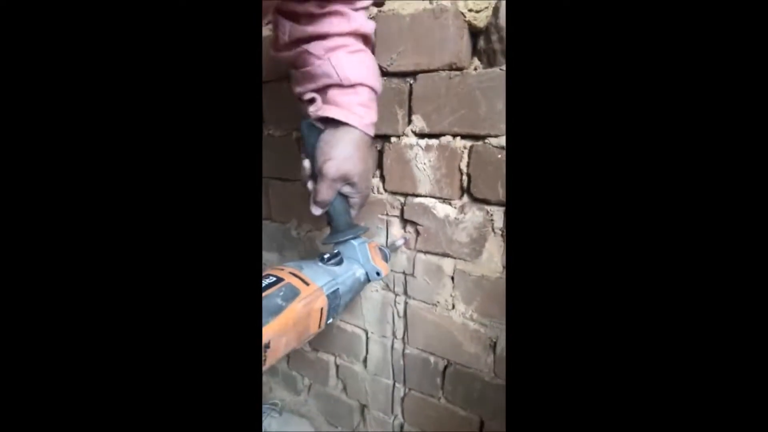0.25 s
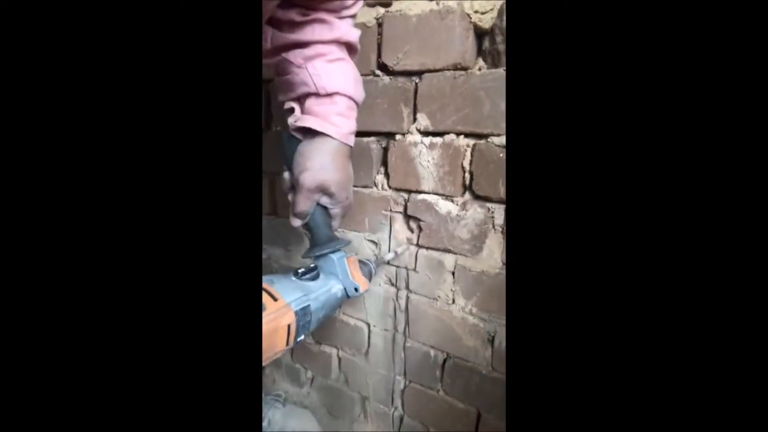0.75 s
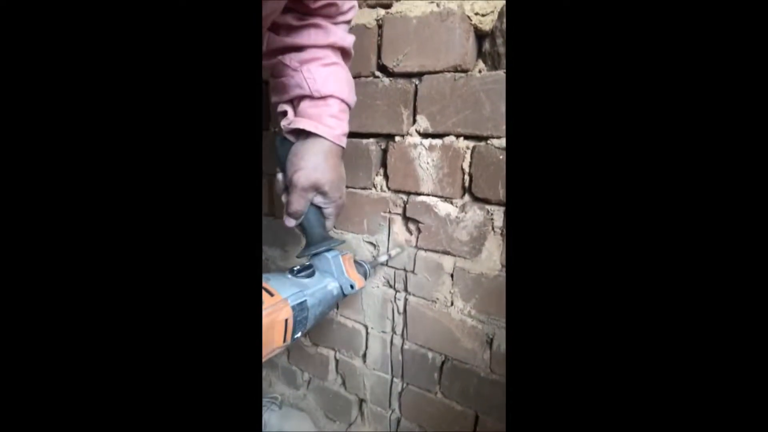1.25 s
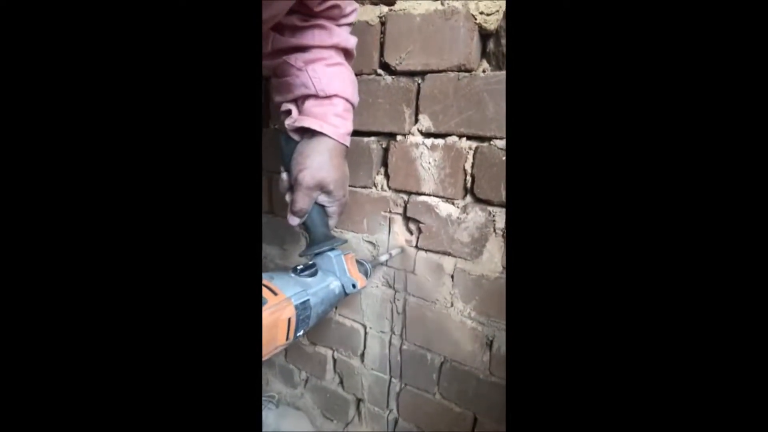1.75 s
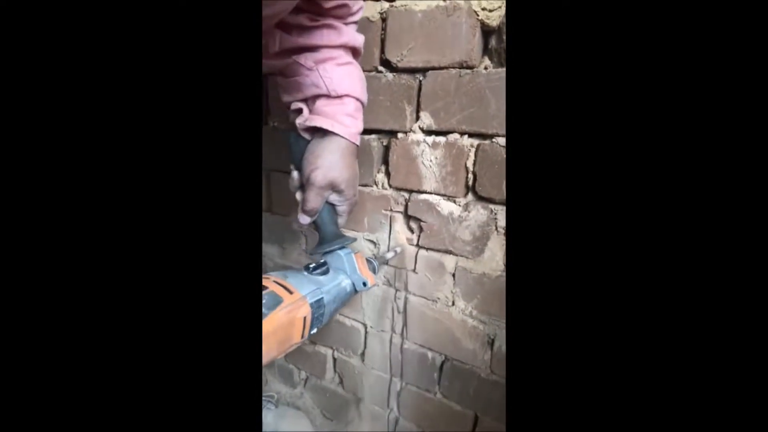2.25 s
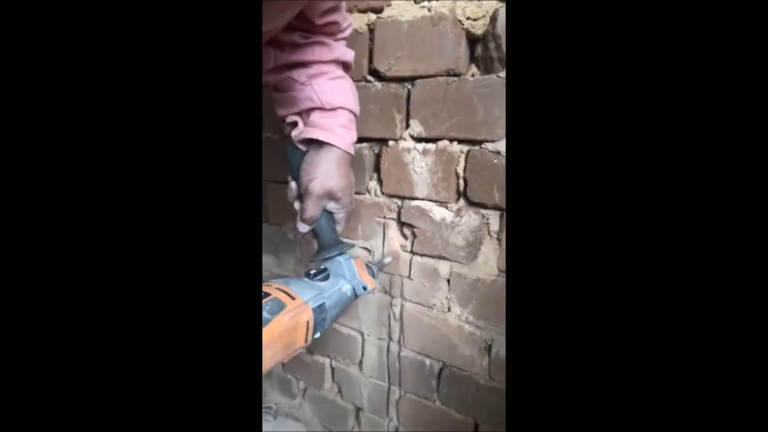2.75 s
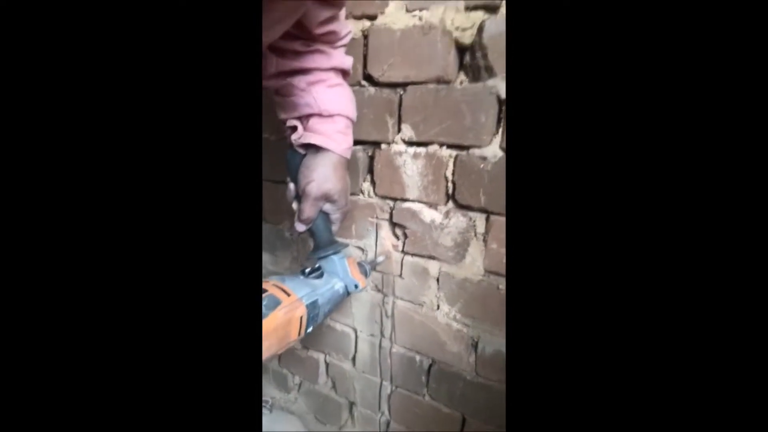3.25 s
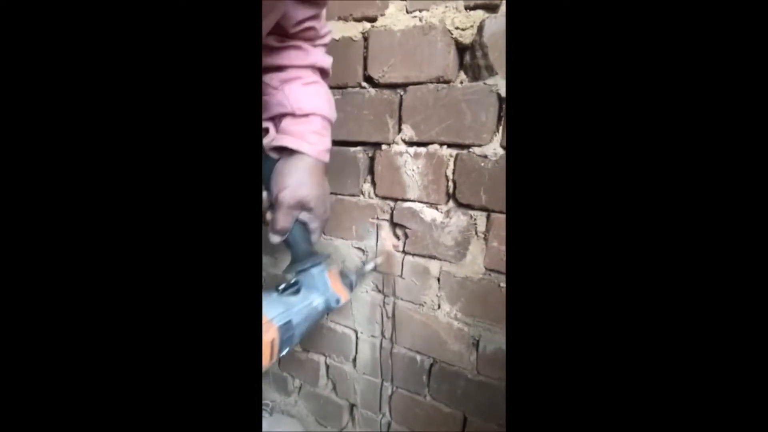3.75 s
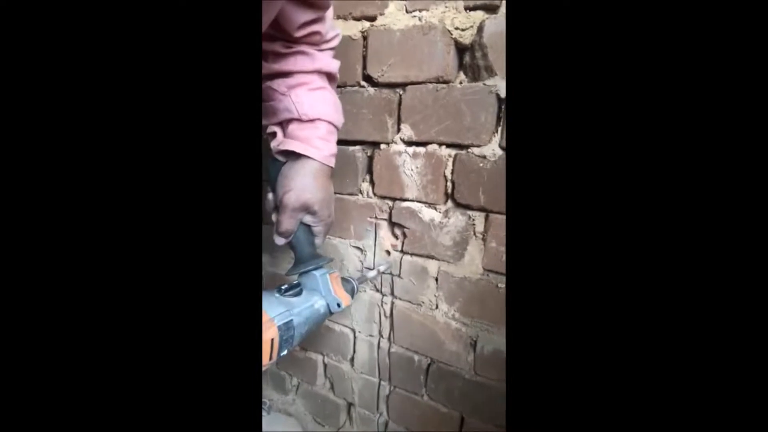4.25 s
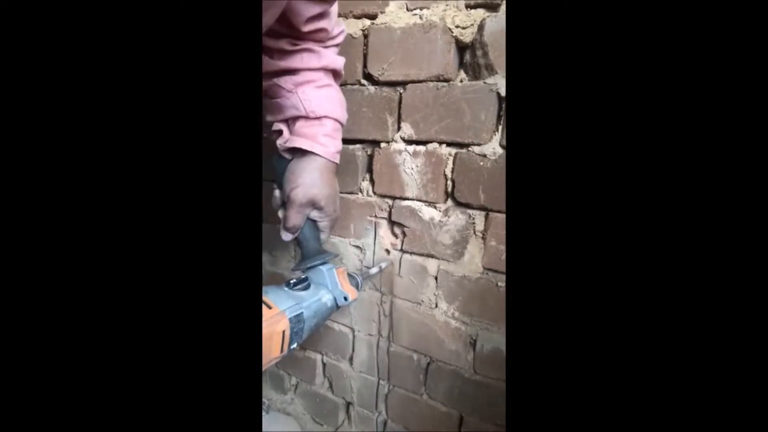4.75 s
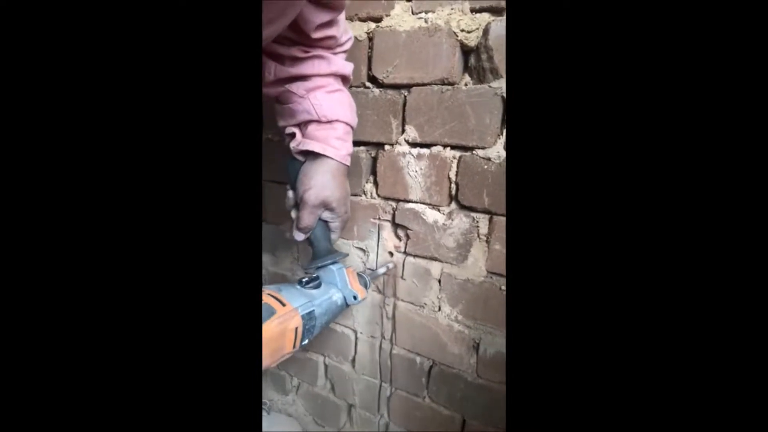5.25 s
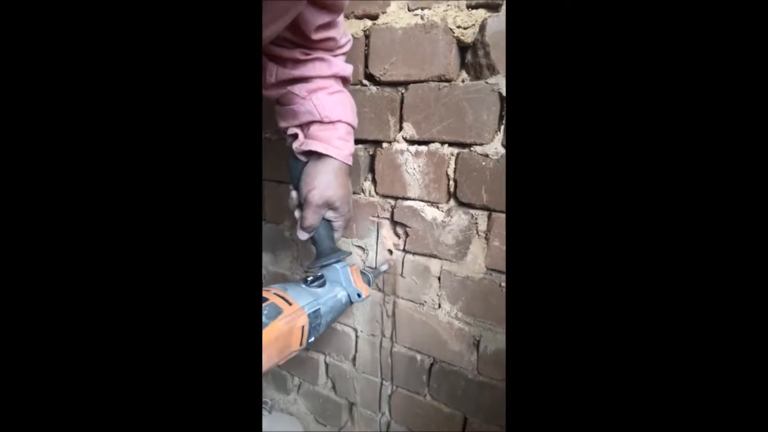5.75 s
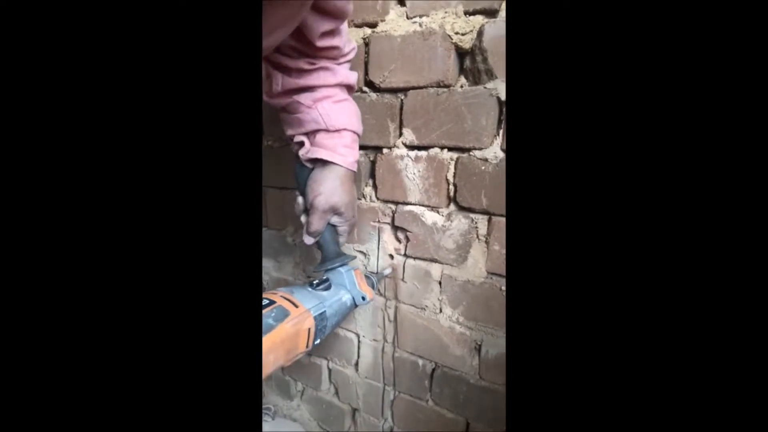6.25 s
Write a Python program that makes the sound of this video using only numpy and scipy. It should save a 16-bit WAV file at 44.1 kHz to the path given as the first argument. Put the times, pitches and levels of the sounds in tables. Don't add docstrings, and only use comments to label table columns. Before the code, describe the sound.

Close, mono phone pickup of a hand drill on a brick wall outdoors. It starts already biting, a brief hard rattle, then the motor runs free with a whine and fan rush. A second dense burst of ringing knocks and grit follows, fades into light ticks and airy whirring, then a third, longer burst grinds on and loosens into weaker taps at the end.

```python
import sys
import numpy as np
from scipy import signal
from scipy.io import wavfile
from scipy.ndimage import uniform_filter1d

SR = 44100
rng = np.random.default_rng(int(sys.argv[2]) if len(sys.argv) > 2 else 0)


def transcribe(signal):
    frames = np.atleast_2d(signal).T
    limited = np.clip(frames, -1, 1)
    pcm = np.round(limited * 32767).astype(np.int16)
    wavfile.write(sys.argv[1], SR, pcm)


def decibels_to_gain(level_db):
    exponent = np.asarray(level_db, float) / 20
    return 10 ** exponent


N = 287091

# (start [s], end [s])
PUSHES = [
    (-.01, .34),
    (1.51, 2.9),
    (4.51, 6.29),
]
# (time [s], peak level [dB])
FIRST_PUSH = [(0.0046, -11), (0.029, -10), (0.0504, -10), (0.0608, -13), (0.0643, -13), (0.0792, -13),
              (0.0892, -13), (0.0926, -17), (0.1029, -9.5), (0.1244, -9), (0.149, -7), (0.153, -13),
              (0.172, -8.5), (0.203, -9), (0.2077, -12), (0.2203, -10), (0.2388, -7.5), (0.2495, -10),
              (0.2733, -11), (0.2775, -11), (0.29, -6.5), (0.3013, -12)]
# (time [s], peak level [dB])
SECOND_PUSH = [(1.5129, -9), (1.5338, -12.5), (1.541, -10), (1.5835, -17), (1.606, -12), (1.61, -12),
               (1.6245, -20), (1.628, -4.5), (1.639, -12), (1.654, -9), (1.6582, -5.5), (1.6613, -5),
               (1.6727, -8), (1.679, -7), (1.6826, -6), (1.695, -9), (1.7093, -6.5), (1.715, -11),
               (1.7283, -14), (1.748, -9), (1.752, -8), (1.7825, -4), (1.787, -9), (1.822, -11.5),
               (1.8263, -5), (1.83, -6), (1.8347, -9), (1.849, -13), (1.8636, -8), (1.879, -12),
               (1.8867, -7), (1.897, -15), (1.918, -6), (1.9386, -6), (1.9492, -9), (1.9534, -13),
               (1.9588, -4), (2.0078, -8.5), (2.0141, -8), (2.0382, -7), (2.048, -5.5), (2.058, -7),
               (2.07, -9), (2.0818, -3.5), (2.0863, -8), (2.0923, -10), (2.106, -5), (2.1127, -6),
               (2.1166, -14), (2.1286, -8), (2.1402, -11), (2.1522, -4), (2.1651, -7), (2.18, -10),
               (2.1838, -10),
               (2.193, -11), (2.209, -6), (2.215, -3), (2.2256, -8), (2.234, -11), (2.2428, -7),
               (2.2557, -6), (2.2632, -8), (2.269, -9), (2.281, -9), (2.2954, -9), (2.305, -11), (2.31, -8),
               (2.3235, -12), (2.3273, -13), (2.3376, -7), (2.3626, -13), (2.366, -13), (2.3755, -7),
               (2.383, -8), (2.3948, -10.5), (2.404, -14), (2.4183, -15), (2.4213, -7), (2.429, -8),
               (2.4433, -13), (2.475, -5), (2.4875, -8.5), (2.4981, -8.5), (2.514, -9.5), (2.522, -12.5),
               (2.5275, -12.5), (2.5428, -10), (2.5468, -7.5), (2.561, -11), (2.588, -10.0), (2.6, -12),
               (2.6064, -15), (2.617, -9), (2.6296, -11), (2.6347, -11), (2.6486, -13), (2.6633, -11.0),
               (2.6832, -9), (2.6978, -11), (2.714, -10), (2.7302, -10.5), (2.736, -12), (2.7675, -9.5),
               (2.7728, -9.5), (2.7995, -16), (2.8206, -6.5), (2.8276, -9), (2.862, -13), (2.887, -12)]
# (time [s], peak level [dB])
THIRD_PUSH = [(4.5182, -9.5), (4.5577, -9.5), (4.57, -15), (4.5772, -7), (4.5827, -4.5), (4.594, -11),
              (4.6138, -6), (4.6294, -9), (4.6546, -14), (4.6662, -13), (4.6756, -8), (4.6869, -9),
              (4.698, -8), (4.7089, -7), (4.7222, -10), (4.7331, -11), (4.743, -14), (4.7473, -8),
              (4.7643, -9.5), (4.769, -8.5), (4.791, -12.5), (4.796, -7), (4.807, -11), (4.8218, -12),
              (4.8317, -12), (4.844, -5), (4.8543, -7), (4.8702, -12), (4.8812, -10.5), (4.8921, -10),
              (4.8973, -12), (4.9083, -8), (4.918, -9.5), (4.9283, -13), (4.943, -9), (4.9522, -10),
              (4.9574, -9), (4.97, -12), (4.9797, -10), (4.988, -9), (4.9963, -10), (5.006, -11.0),
              (5.016, -10), (5.0272, -11.0), (5.043, -8), (5.055, -8.5), (5.077, -12), (5.092, -7),
              (5.117, -11), (5.14, -12), (5.1458, -13), (5.171, -9), (5.182, -9), (5.1873, -9),
                (5.1923, -7), (5.2011, -10.5), (5.213, -9), (5.231, -13), (5.2475, -11), (5.2557, -10.5),
                (5.2683, -8), (5.2745, -9), (5.2923, -12), (5.302, -13), (5.3317, -7), (5.338, -8),
                (5.3429, -11), (5.3585, -8), (5.3621, -8.5), (5.367, -12), (5.385, -9), (5.3897, -8),
                (5.4016, -9.5), (5.4054, -11.5), (5.409, -9), (5.427, -13), (5.4312, -8.5), (5.4574, -7),
                (5.4705, -10.5), (5.4842, -12), (5.4895, -6.5), (5.5076, -8), (5.5207, -11.5), (5.533, -15),
                (5.5394, -10), (5.552, -7), (5.56, -8.5), (5.5877, -9.5), (5.6, -8), (5.6041, -8),
                (5.6193, -6.5), (5.63, -11), (5.6361, -9), (5.6648, -9.5), (5.6682, -13), (5.6794, -9),
              (5.6904, -8), (5.7095, -10), (5.7186, -11), (5.7521, -9), (5.757, -9), (5.7734, -8),
              (5.7776, -10), (5.7824, -10), (5.7964, -6), (5.8001, -7), (5.805, -9), (5.8125, -11),
              (5.8285, -11), (5.8436, -6), (5.848, -8), (5.8645, -8.5), (5.8739, -13), (5.891, -15),
              (5.8949, -10), (5.9025, -7), (5.9192, -11.5), (5.9401, -8), (5.946, -8), (5.9582, -9.5),
              (5.9698, -11), (5.9841, -9), (5.989, -10), (6.013, -7), (6.0192, -8), (6.0475, -6),
              (6.0825, -8), (6.0859, -11.0), (6.0932, -10), (6.1116, -9), (6.1325, -10), (6.1361, -11),
              (6.1414, -12), (6.1608, -12), (6.182, -7), (6.1875, -9.5), (6.205, -14), (6.2098, -8),
              (6.217, -10), (6.228, -8), (6.233, -4.5), (6.2785, -6), (6.2819, -7)]
SOFT_EARLY = [0.013, 0.0443, 0.0538, 0.0707, 0.1136, 0.136, 0.185, 0.2296, 0.2592, 0.325, 1.5365, 1.5604,
              1.589, 1.7356, 1.7698, 1.793, 1.8, 1.8039, 1.817, 1.8516, 1.868, 1.9287, 1.972, 1.9752,
              1.9797, 1.986, 1.9916, 2.0013, 2.0213, 2.0326, 2.045, 2.0638, 2.148, 2.1597, 2.176, 2.2016,
              2.2205, 2.274, 2.289, 2.348, 2.357, 2.3984, 2.4483, 2.4527, 2.4713, 2.4935, 2.551, 2.572,
              2.5764, 2.5949, 2.622, 2.6722, 2.6903, 2.694, 2.7191, 2.7433, 2.75, 2.7634, 2.784, 2.7934]
SOFT_LATE = [2.815, 2.8407, 2.8457, 4.5117, 4.6422, 4.6483, 4.753, 4.7762, 4.78, 4.8861, 4.9243, 4.9332,
             4.976, 5.033, 5.0502, 5.0723, 5.099, 5.102, 5.114, 5.152, 5.165, 5.221, 5.2377, 5.242, 5.286,
             5.3128, 5.3183, 5.328, 5.3762, 5.3797, 5.414, 5.447, 5.4532, 5.479, 5.496, 5.5694, 5.6096,
             5.6453, 5.654, 5.659, 5.673, 5.7, 5.7033, 5.726, 5.7298, 5.7414, 5.7675, 5.8535, 5.8802, 5.915,
             5.923, 5.9496, 5.9954, 6.0378, 6.059, 6.0704, 6.1167, 6.1696, 6.2402, 6.252]
FAINT_EARLY = [0.0008, 0.007, 0.0164, 0.0335, 0.108, 0.1314, 0.155, 0.1606, 0.178, 0.309, 0.337, 1.553,
               1.6214, 1.6923, 1.7576, 1.7645, 1.8106, 1.844, 1.8562, 1.8937, 1.9024, 1.908, 1.91, 1.924,
               1.935, 1.9444, 1.9664, 2.0253, 2.042, 2.0542, 2.0775, 2.097, 2.1007, 2.1207, 2.1246, 2.1355,
               2.1443, 2.1724, 2.1871, 2.1985, 2.247, 2.2515, 2.2595, 2.2843, 2.3, 2.316, 2.354, 2.424,
               2.4346, 2.467, 2.481, 2.5045, 2.5097, 2.518, 2.582, 2.6259, 2.642, 2.6679, 2.7041, 2.7235]
FAINT_LATE = [2.7783, 2.8517, 2.87, 2.8803, 2.8928, 4.6057, 4.787, 4.813, 4.825, 4.8336, 4.838, 4.8496,
              4.861, 4.8643, 4.9037, 4.9127, 4.921, 4.962, 5.0013, 5.0114, 5.0225, 5.061, 5.066, 5.108,
              5.125, 5.1318, 5.16, 5.2043, 5.262, 5.2812, 5.297, 5.3074, 5.3212, 5.3533, 5.4232, 5.4383,
              5.4652, 5.476, 5.5025, 5.516, 5.55, 5.5759, 5.5806, 5.583, 5.593, 5.5967, 5.6232, 5.6271,
              5.7464, 5.8167, 5.822, 5.8699, 5.9281, 5.9658, 6.041, 6.0641, 6.1529, 6.1787, 6.2608, 6.273]
# (time [s],
# level [dB], rebound delay [ms], rebound level [dB])
TOUCHES = [(.547, -23.5, 9.5, -30), (2.914, -20, 11, -15), (2.943, -19, 6.5, -22), (2.969, -19, 1, -26),
           (2.992, -19, 1.5, -18), (3.015, -16, 7, -22), (3.041, -20, 3.5, -21), (3.0647, -14, 3, -21),
           (3.134, -19, 8, -31), (3.1622, -26, 8.5, -23), (3.2195, -20, -0.5, -33), (3.325, -18, 7, -17),
           (3.364, -21, 13.5, -17.5), (3.422, -20, -14, -25), (3.4535, -22, 11, -23),
           (3.478, -21, 7.5, -24), (3.502, -22, 12.5, -20), (3.524, -18, 3.5, -22), (3.5462, -23, 1, -21),
           (3.5656, -19, 3.5, -20), (3.587, -25, 1, -16), (6.3026, -11, 5.5, -5), (6.3118, -16, -11, -20),
           (6.3284, -15, 6, -17), (6.3457, -20, 5.5, -11), (6.3755, -16, 5, -9), (6.397, -13, 5, -15),
           (6.4216, -14, 1.5, -22), (6.443, -13, 1, -15), (6.47, -16, 6, -11), (6.5, -17, -1, -34)]
BLOW_DB, CEILING_DB = -15, -12
SQUEEZE = 1.19
SOFT_DB, FAINT_DB = -17, -19

# (frequency [Hz], level [dB])
BIT = [
    (650, -14),
    (1300, -11),
    (1890, -4),
    (2290, 2),
    (3170, -3.5),
    (4150, 2.5),
    (4620, -3.5),
    (6100, 2),
    (9180, -8.5),
]
BIT_WIDTH_HZ = [750, 600, 480, 360, 200, 520, 350, 800, 500]
# (time [s], shank ring [dB], tip ring [dB], loose grit [dB])
SEAT = [(0, 4.5, -0.5, -18), (.35, 7, 2.5, -11.5), (1.5, -12, 2, -7), (1.75, -5, 2.5, -12),
        (2.2, -1.5, 3, -23), (2.8, 5.5, 3.5, -9.5), (3.1, 3, 6.5, -11), (3.6, 7, 8, -11), (4.5, -6, 7, -16),
        (4.9, -4.5, 3.5, -14), (5.3, 3, 2.5, -11.5), (5.8, 4.5, 4.5, -10.5), (6.2, 3.5, 4.5, -12),
        (6.51, 3.5, 9.5, -23)]

# (time [s], turns [Hz], first order [dB], fourth order [dB], second and third orders [dB])
ARMATURE = [(0, 430, -45, -59, -70), (.3, 424.6, -43, -39, -69), (.5, 454, -39, -37, -55),
            (.8, 405, -43.5, -65, -64), (.95, 406, -43.5, -52, -64), (1.05, 438, -42.5, -51, -48.5),
            (1.5, 436.8, -39, -31, -44), (1.75, 438, -41.5, -36, -52), (2.2, 427.4, -47, -34, -80),
            (2.9, 430.6, -43.5, -33.5, -48), (3.2, 443.3, -41.5, -36, -46.5),
            (3.6, 447.3, -41, -35.5, -45.5), (4.4, 446.7, -38, -38, -45), (4.7, 444.3, -38.5, -30, -60),
            (5.1, 443.7, -39, -47, -71), (5.5, 428.2, -43, -35, -64), (6, 441, -40, -32.5, -48),
            (6.51, 444, -36, -32, -41)]
# (time [s], pitch [Hz], level [dB], octave level [dB])
GEAR = [(0, 780, -46, -36), (.3, 758, -41, -37), (.4, 736, -74, -65), (1.7, 761, -85, -65),
        (1.8, 765, -38, -58), (2.85, 768, -38, -58), (2.95, 807, -60, -65), (4.5, 818, -53, -65),
        (4.8, 815, -41, -62), (5.2, 794.6, -36, -60), (5.6, 785, -36, -60), (6.1, 792, -37.5, -60),
        (6.51, 816, -41, -60)]

# (frequency [Hz], density [dB per Hz])
AIR = [(20, -45), (45, -25), (65, -19), (120, -24), (200, -17.5), (350, -1), (700, 8), (950, -3.5),
       (1300, 1), (2300, -4.5), (5000, -3.5), (8000, -7.5), (12000, -13.5), (16000, -18)]
# (frequency [Hz], width [Hz], level [dB])
HOUSING = [
    (1350, 300, 3),
    (1780, 200, 4),
    (4750, 400, 2),
    (5550, 600, -5),
    (11100, 1300, 7.5),
]
# (time [s], share [0-1])
FREE = [(0, 0), (.35, 0.7), (.95, 1), (1.2, 0.87), (1.5, 1), (1.6, 0.05), (3, 0.45), (3.7, 0.7), (4, 1.01),
        (4.5, 0.98), (4.75, 0.33)]
# (time [s], level [dB])
NOISE_SWELL = [(0, -0.5), (.4, 0.5), (.65, -1), (.92, -1), (1.15, 3), (1.49, 5), (1.7, 3), (2.7, 1.5),
               (3.3, 1.5), (3.7, 2), (4.1, 3.5), (4.5, 4.5), (4.8, 2), (5.5, 2), (6.51, 5)]
# (level at rest [dB], share of the slow swell [ratio], added by a push [dB])
NOISES = [
    (-44, 0.94, 1.5),
    (-30.5, 1.09, -1.5),
    (-32.5, 1.09, 1),
    (-51.5, 0.37, 0),
]
GRIND_DB, HUSH_DB = 2.5, -3.2
GRIND_S = .006

# (frequency [Hz], level [dB])
HUM = [
    (60, -64),
    (90, -65.5),
    (240, -55),
]
# (start [s], end [s], from [Hz], to [Hz], level [dB])
PASSING = [
    (3.48, 3.72, 298, 275, -46.5),
    (3.53, 3.743, 230, 180, -52.5),
    (3.74, 4.153, 85, 53, -54),
    (4.2, 4.46, 70, 57, -57),
    (0.38, 0.72, 80, 77, -62),
    (0.79, .95, 15750, 15480, -44),
]

# (time [s], share of weak bins lost [0-1])
THINNED = [(1.041, 0.25), (1.554, 0.45), (1.752, 0.33), (1.766, 0.22), (2.043, 0.44), (2.195, 0.6),
           (2.28, 0.33), (2.382, 0.44), (2.77, 0.32), (2.875, 0.5), (2.94, 0.29), (3.025, 0.25),
           (3.475, 0.45), (3.71, 0.38), (4.67, 0.34), (4.84, 0.62), (5.01, 0.29), (5.05, 0.44),
           (5.159, 0.44), (5.245, 0.56), (5.31, 0.46), (5.587, 0.48), (5.735, 0.71), (6.16, 0.58),
           (6.267, 0.37)]
TREBLE_CUT_DB = [1, -7, -27, -22, -9, -9, -6, -10, -12, -5, -4, -2, -6, -3, -5, -8, -10, -4, -3, -5, -9, -6,
                 -9, -11, -9]
EDGE_HZ, TREBLE_HZ = 15830, 9500


def evened(x):
    return x / np.sqrt(np.mean(x ** 2) + 1e-20)


def curves(rows, t):
    s, *columns = np.transpose(rows)
    return [np.interp(t, s, c) for c in columns]


def drift(rate_hz):
    return evened(signal.lfilter(*signal.butter(2, rate_hz, fs=SR), rng.standard_normal(N)))


def pushing(t):
    return sum((t > start) * (t < end) * 1. for start, end in PUSHES)


def blows():
    struck = FIRST_PUSH + SECOND_PUSH + THIRD_PUSH
    at, peak_db = np.transpose(struck)
    soft = np.ravel(SOFT_EARLY + SOFT_LATE)
    faint = np.ravel(FAINT_EARLY + FAINT_LATE)
    touch, touch_db, rebound_ms, rebound_db = np.transpose(TOUCHES)
    blow_db = BLOW_DB + SQUEEZE * (peak_db - CEILING_DB)
    times = np.r_[np.r_[at, soft, faint] - .0002, touch, touch + rebound_ms / 1000]
    return times, np.r_[blow_db, SOFT_DB + 0 * soft, FAINT_DB + 0 * faint, touch_db, rebound_db]


def ring(hz, width, rise=0.00018):
    u = np.arange(-60, 900) / SR
    swell_and_decay = np.where(u < 0, np.exp(-(u / rise) ** 2 / 2), np.exp(-np.pi * width * u))
    return np.cos(2 * np.pi * hz * u) * swell_and_decay


def bit(hits, blows_db):
    count = len(hits)
    delay = rng.uniform([-.0005, .0008, .0015], [-.0001, .002, .004], (count, 3))
    grit = (hits[:, None] + delay).ravel()
    shank_db, tip_db, grit_db = curves(SEAT, np.append(hits, grit))
    at = np.round(np.append(hits + .0003, grit) * SR).astype(int)
    rattle_db = grit_db[count:] + blows_db.repeat(3) + 4 + 3.5 * rng.standard_normal(len(grit))
    size_db = np.append(blows_db, rattle_db)
    size_db[count::3] = blows_db - 5

    hz, db = np.transpose(BIT)
    seat_db = np.outer(shank_db, abs(hz - 3200) < 400) + np.outer(tip_db, abs(hz - 6250) < 400)
    mix = decibels_to_gain(1.2 * rng.standard_normal((len(at), len(BIT))))
    evenness = np.sqrt((mix ** 2).mean(1, keepdims=True))
    mix *= decibels_to_gain(db + seat_db + size_db[:, None]) / evenness
    lag = rng.integers(-1, 4, mix.shape)
    lag[count:] *= 3
    trains = [np.bincount(np.clip(at + lag[:, k], 0, N - 1), mix[:, k], N) for k in range(len(BIT))]
    rings = sum(signal.oaconvolve(x, ring(f, width))[60:N + 60]
                for x, f, width in zip(trains, hz, BIT_WIDTH_HZ))

    dust_decay = np.exp(-1 / (.0012 * SR))
    dust = signal.lfilter([1], [1, -dust_decay], np.roll(trains[-1], -10)) * rng.standard_normal(N)
    crack = signal.sosfilt(signal.butter(4, 7500, "high", fs=SR, output="sos"), dust)
    rings = signal.sosfilt(signal.butter(3, 450, "high", fs=SR, output="sos"), rings)
    return rings + decibels_to_gain(-12.5) * crack


def tone(hz, db, waver_db, wander=0.00407):
    turns = np.cumsum(hz * (1 + wander * drift(10.84))) / SR
    return np.sqrt(2) * decibels_to_gain(db + waver_db * drift(20.0)) * np.sin(2 * np.pi * turns)


def whine(t):
    hz, first_db, fourth_db, between_db = curves(ARMATURE, t)
    mesh_hz, mesh_db, octave_db = curves(GEAR, t)
    orders = tone(hz, first_db, 1.5 + 2.5 * pushing(t))
    orders += tone(2 * hz, between_db, 3.)
    orders += tone(3 * hz, between_db + 1, 4., .004)
    orders += tone(4 * hz, fourth_db - 1, 3, .003)
    gear = tone(mesh_hz, mesh_db, 0.8) + tone(2 * mesh_hz, octave_db, 1.8)
    return orders + gear


def motor_noise():
    frames, hz = N // 256 + 5, np.fft.rfftfreq(1024, 1 / SR)
    t = np.arange(frames) * 256 / SR
    swell_db = curves(NOISE_SWELL, t)[0]
    load = uniform_filter1d(pushing(np.minimum(t, 6.2)), size=12)
    drone_db, roar_db, hiss_db, rumble_db = [rest_db + share * swell_db + push_db * load
                                             for rest_db, share, push_db in NOISES]
    a, b, patches = rng.standard_normal((frames, 513, 3)).T
    patches = uniform_filter1d(patches, size=12, axis=0)
    patches = evened(uniform_filter1d(patches, size=4, axis=1))

    pitch = np.log(hz + 1)
    air_hz, air_db = np.transpose(AIR)
    colour_db = np.interp(pitch, np.log(air_hz), air_db)
    bumps_db = sum(db / (1 + (2 * (hz - f) / width) ** 2) for f, width, db in HOUSING)
    singing = curves(FREE, t)[0]

    levels = np.array([rumble_db + 56, drone_db + 35, drone_db + 35, roar_db + 30, roar_db + 30, hiss_db + 33])
    corners = np.log([190, 330, 800, 1000, 1700, 2300])
    shares = np.array([np.interp(pitch, corners, row) for row in np.eye(6)])
    shape_db = colour_db[:, None] + np.outer(bumps_db, singing) + shares.T @ levels
    z = (a + 1j * b) * decibels_to_gain(shape_db + 1.27 * patches - 46)
    noise = signal.istft(z, nperseg=1024, noverlap=768)[1][:N]
    return noise * decibels_to_gain(0.3 * drift(160.0))


def grind(t, hits, hits_db):
    busy = np.bincount(np.clip((hits * SR).astype(int), 0, N - 1), hits_db > -100, N)
    span = int(GRIND_S * SR)
    busy = np.minimum(uniform_filter1d(busy, span) * span, 1)
    busy = uniform_filter1d(busy, size=90)
    held = uniform_filter1d(pushing(t), size=400)
    return decibels_to_gain(GRIND_DB * busy + HUSH_DB * (0.5 - busy) * held)


def yard(x):
    u = np.arange(4000) / SR
    taps = rng.standard_normal(4000) * decibels_to_gain(-60 * u / 0.04) * (u > .0015)
    return x + decibels_to_gain(-17) * signal.oaconvolve(x, taps / np.linalg.norm(taps))[:N]


def passing(t):
    total = 0
    for start, end, from_hz, to_hz, db in PASSING:
        swell = np.sin(np.pi * np.clip((t - start) / (end - start), 0, 1)) ** 0.31
        glide_hz = np.interp(t, [start, end], [from_hz, to_hz])
        total = total + swell * tone(glide_hz, db, 3, .15 / np.sqrt(from_hz))
    return total


def distant_hum():
    return sum(tone(hz, db, 3.2, 0.0085) for hz, db in HUM)


def scene():
    t = np.arange(N) / SR
    hits, hits_db = blows()
    knocks = yard(bit(hits, hits_db))
    motor = whine(t) + motor_noise() * grind(t, hits, hits_db)
    background = passing(t) + distant_hum()
    return np.tile(knocks + motor + background, (2, 1))


def thin_out(x):
    hz, t, z = signal.stft(x, SR, nperseg=1024, noverlap=768)
    lost = np.array([share * np.exp(-((t - s) / 0.012) ** 4) for s, share in THINNED])
    most = lost.max(0)
    bands = rng.random((65, len(THINNED))).repeat(8, axis=0)[:513][:, lost.argmax(0)]
    weak = abs(z) < decibels_to_gain(4) * uniform_filter1d(abs(z), size=40, axis=0)
    cuts_db = [db * np.exp(-((t - s) / 0.013) ** 4) for (s, _), db in zip(THINNED, TREBLE_CUT_DB)]
    cut_db = np.array(cuts_db).min(0)
    reach = np.clip((hz - TREBLE_HZ) / 2000 + 1, 0, 1) ** 2 + (hz < 300)
    z = z * decibels_to_gain(np.outer(reach, cut_db))
    z = z * np.where((bands < most * 1.2) & weak, decibels_to_gain(-40 * most), 1)
    return signal.istft(z, SR, nperseg=1024, noverlap=768)[1][:N]


def roll_off(x):
    return signal.sosfilt(signal.butter(12, 16970, fs=SR, output="sos"), x)


def record(dry):
    x = dry[0]
    power_db = 10 * np.log10(uniform_filter1d(x ** 2, size=130) + 1e-12)
    fall = np.arange(N) * 350. / SR
    held_db = np.maximum.accumulate(power_db + fall) - fall
    over_db = np.maximum(held_db + 18.5, 0)
    x = x / decibels_to_gain(.6 * uniform_filter1d(over_db, size=60))
    x = thin_out(.52 * np.tanh(x / .52))
    x = signal.oaconvolve(x, signal.firwin(2047, EDGE_HZ, window=("kaiser", 9), fs=SR), "same")
    x = signal.sosfilt(signal.butter(2, 55, "high", fs=SR, output="sos"), x)
    return roll_off(np.tile(x, (2, 1)))


dry = scene()
out = record(dry)
transcribe(out)
```